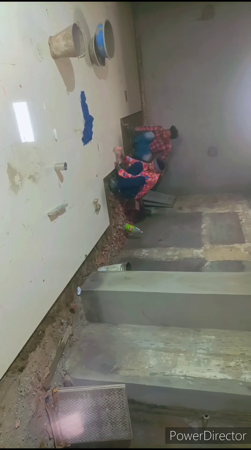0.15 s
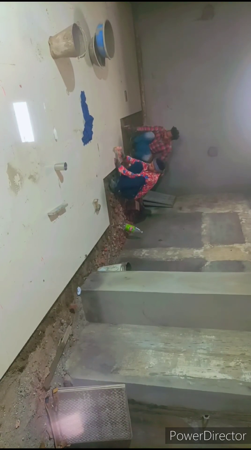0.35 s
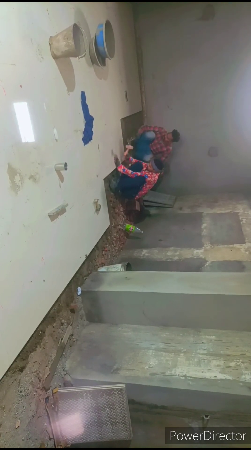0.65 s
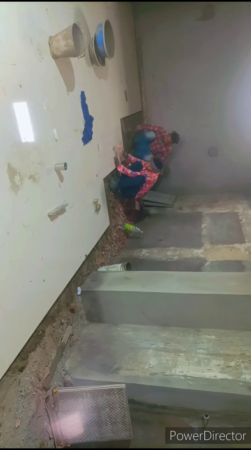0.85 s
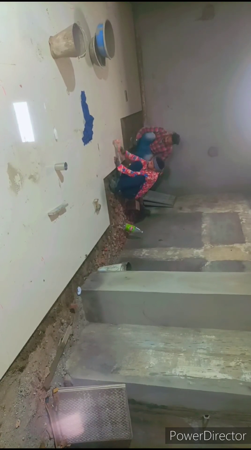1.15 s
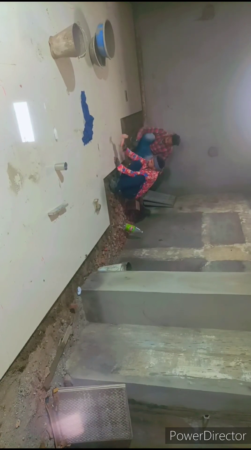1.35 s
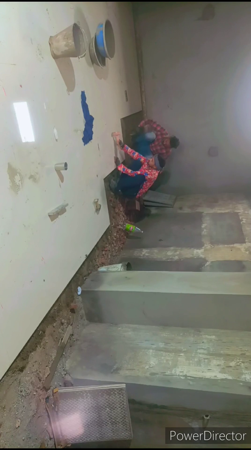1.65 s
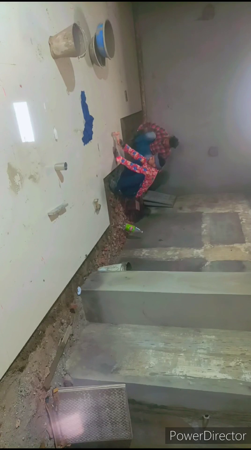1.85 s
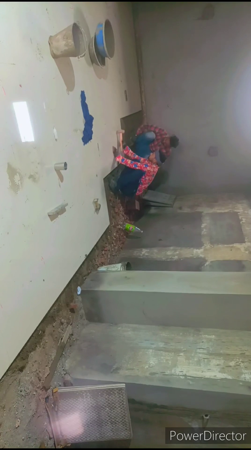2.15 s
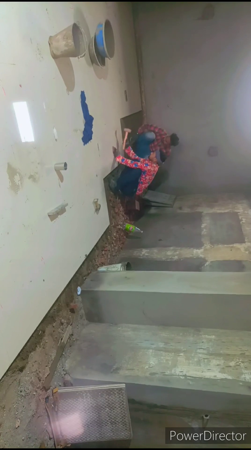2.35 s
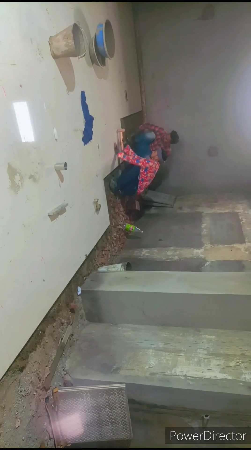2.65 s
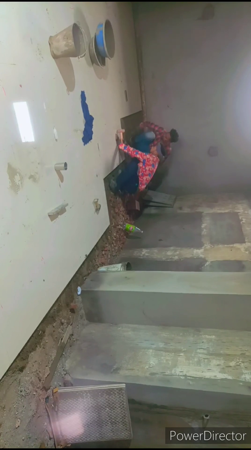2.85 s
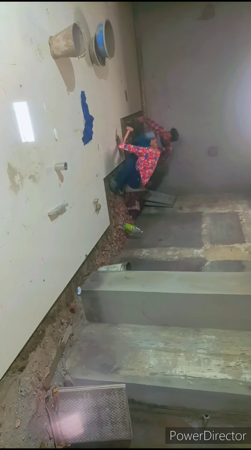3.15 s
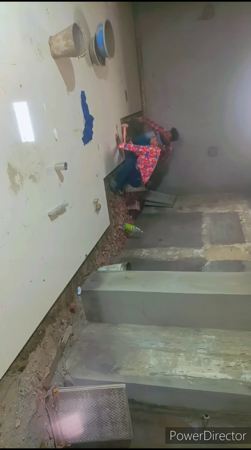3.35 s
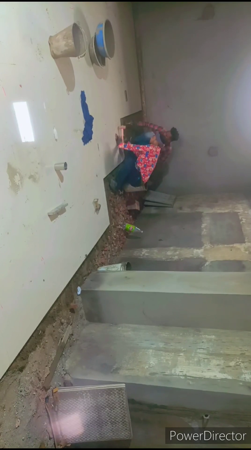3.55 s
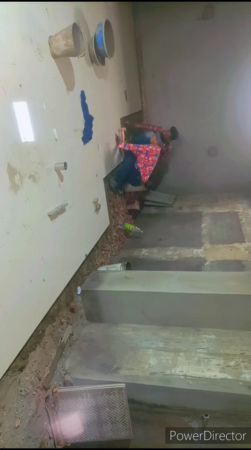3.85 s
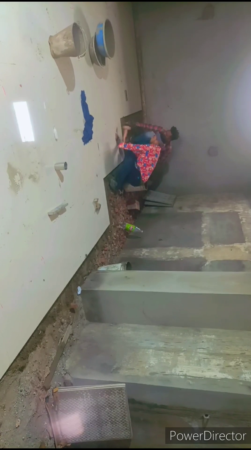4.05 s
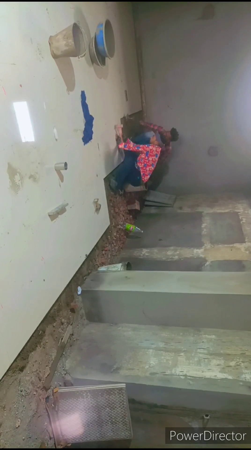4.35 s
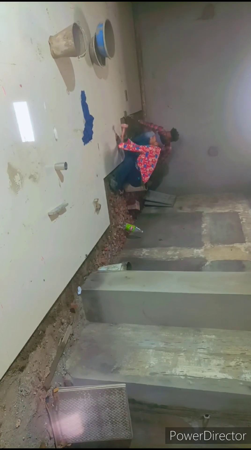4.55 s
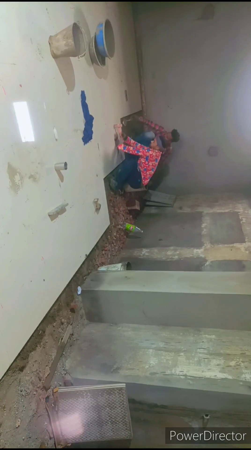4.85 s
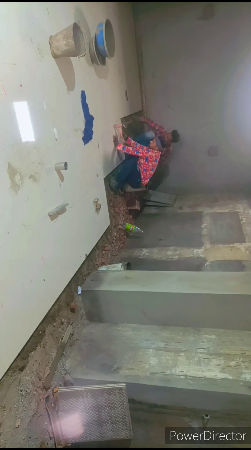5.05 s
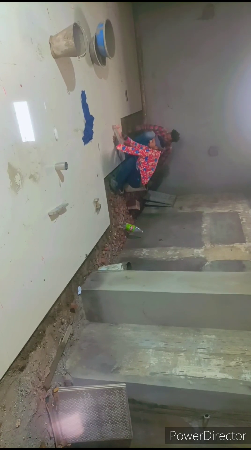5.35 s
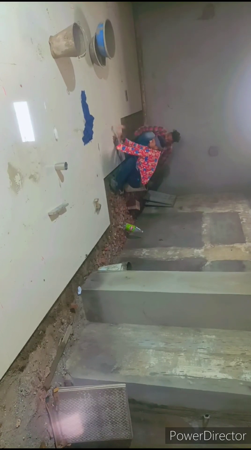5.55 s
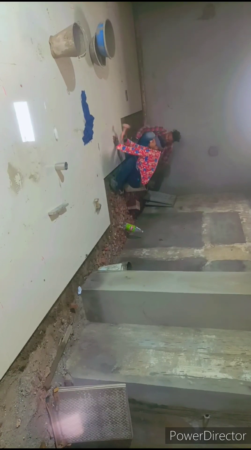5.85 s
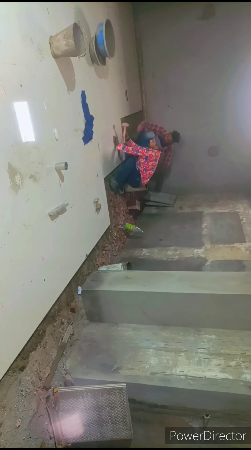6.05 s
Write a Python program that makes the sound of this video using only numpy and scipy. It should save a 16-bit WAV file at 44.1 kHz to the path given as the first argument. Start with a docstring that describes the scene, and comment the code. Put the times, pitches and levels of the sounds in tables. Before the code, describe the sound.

Heavy, hollow mallet thuds on tile, two or three a second at most, boom through an empty concrete room, with faint gritty swishes between.

```python
"""Bedding a floor tile with a rubber mallet

A tiler strikes a tile a few metres away in a bare concrete room. Each blow is a short knock plus a tile clack,
returned by the walls as a long boom: shaped noise and standing waves that alter as the mallet moves.
Shaped noise gives faint gritty swishes between blows (perhaps a hand on the tile), one tick and still air.
Gain control flattens the attacks."""
import sys
import numpy as np
from scipy import signal
from scipy.fft import rfft, irfft
from scipy.io import wavfile
from scipy.ndimage import uniform_filter1d, minimum_filter1d

SR = 44100
rng = np.random.default_rng(int(sys.argv[2]) if len(sys.argv) > 2 else 0)


def log_audio(samples):
    """Write samples as a 16-bit WAV file to the path given in sys.argv[1]."""
    # one column per channel
    frames = np.atleast_2d(samples).T
    # limit to full scale, then quantise
    limited = np.clip(frames, -1, 1)
    pcm = np.round(limited * 32767).astype(np.int16)
    wavfile.write(sys.argv[1], SR, pcm)


N = 273400

# colour of grit on the tile: (frequency [Hz], relative level [dB/Hz])
GRIT_SPECTRUM = [(500, -18), (2500, 10), (5000, 3.5), (7500, 1), (9500, -7.5), (15500, -12.5)]


def mallet(level_db=4, boom_db=-18.0, modes_db=-32, clack_level_db=-24.0, size=98304):
    """Blows on nearly the same spot wake nearly the same echoes; short waves change first as the spot moves."""
    # blows: (time [s], force [dB], hollowness of the spot [dB], clack pitch [Hz])
    blows = [ (-.27, 0.5, 6, 3400), (.045, .5, 2.5, 3420), (0.6854, 1.5, 3.5, 3290), (1.0778, .5, 4, 3390),
             (1.397, 0.5, 3, 4000), (2.0933, 1.5, 0, 4000), (2.4166, 4.5, -0.7, 3204),
             (3.1754, 0.5, -1.5, 4010), (3.4824, 1.5, -1.5, 3326), (3.777, 0.5, -2, 4005),
             (4.0575, -0.5, 0.5, 3300), (4.3168, 1.5, -0.2, 3930), (4.563, 1.7, 2.5, 3310),
             (5.2343, -0.5, 1.5, 3290), (5.5436, 1, 4.5, 3810), (5.8701, -0.2, 1, 3390),
             (6.1525, -4.5, -2, 3310)]
    # radiation of mallet and bedded tile: (frequency [Hz], relative level [dB/Hz])
    thud_spectrum = [(25, -40.5), (68, -28), (82, -14), (110, -12), (165, 2.5), (400, 3), (680, 0.5),
                     (1300, -11), (1700, -10.5), (2070, -11), (2300, -21.5), (3300, -26.5), (5000, -40),
                     (7500, -44), (15500, -63.5)]
    # a hollow spot thumps deeper, clicks brighter: (frequency [Hz], gain per dB of hollowness [dB/dB])
    hollow_tilt = [(190, 1.0), (330, 0), (650, 0.23), (1050, -0.25), (1700, 1.01), (3500, 0.95)]
    # standing waves of the room: (frequency [Hz], relative level [dB])
    room_modes = [(81, 1.5), (178, -17.5), (285, -19), (312, -6.5), (361, 2), (398, 4), (431, 3.5),
                  (484, -1), (554, -1), (630, -0.5), (657, 4.5), (721, -6.5), (759, -10), (824, 4.5),
                  (921, -20), (991, -19.5)]
    aim_m = 0.017  # typical distance between successive blows
    shift_s, shift_m = 1.9, 0.18  # one move, in a pause, to another part of the tile
    clack_choke = 0.5  # dB of clack lost per dB of hollowness: a solid spot clacks hardest

    hz = np.fft.rfftfreq(size, 1 / SR)
    t = np.arange(size) / SR
    wavenumber = 2 * np.pi * hz / 343  # rad/m
    mode_hz, mode_db = np.transpose(room_modes)
    mode_wavenumber = np.interp(mode_hz, hz, wavenumber)
    waves = gain_of(modes_db + mode_db)[:, None] * np.exp(2j * np.pi * mode_hz[:, None] * t)
    phases = rng.uniform(0, 2 * np.pi, len(mode_hz))
    echoes = rfft(rng.standard_normal(size))
    early = first_arrivals(hz)
    out = np.zeros(N)
    previous_s = -np.inf
    for s, force_db, hollow_db, clack_hz in blows:
        move_m = shift_m if previous_s < shift_s <= s else aim_m
        previous_s = s
        alike = np.exp(-wavenumber * move_m)
        fresh = rfft(rng.standard_normal(size))
        echoes = alike * echoes + np.sqrt(1 - alike ** 2) * fresh
        phases = phases + mode_wavenumber * move_m * rng.standard_normal(len(mode_hz))

        standing = (np.exp(1j * phases) @ waves).real
        room = gain_of(boom_db) * die_away(irfft(echoes) + standing)
        room[:size // 2] += early[:size // 2]

        spectrum = [(f, db + hollow_db * read(hollow_tilt, f)) for f, db in thud_spectrum]
        knock = signal.fftconvolve(room, causal_pulse(spectrum))
        add(out, s, gain_of(level_db + force_db) * knock)
        clack_db = clack_level_db + force_db - clack_choke * hollow_db
        add(out, s, gain_of(clack_db) * clack(clack_hz, room))
    return out


def clack(hz, room, t60_s=0.0094, upper_hz=4300, upper_db=-4, wall_s=0.0056, wet_db=-9):
    """Two bending modes of the tile, choked by the mortar; they beam sideways and arrive off the near wall."""
    t = np.arange(2048) / SR
    modes = np.sin(2 * np.pi * hz * t) + gain_of(upper_db) * np.sin(2 * np.pi * upper_hz * t)
    ring = modes * np.exp(-np.log(1000) * t / t60_s)
    path = gain_of(wet_db) * room / np.linalg.norm(room)
    path[round(wall_s * SR)] += 1
    return signal.fftconvolve(path, ring)


def first_arrivals(hz, treble_hz=5200):
    """Direct sound and single reflections; the treble comes off some walls more strongly."""
    # direct sound and nearest walls: (delay [s], level [dB], extra treble [dB])
    arrivals = [(0, 5.5, 4.5), (.0064, -11.5, -0.5), (0.013, -3, -2), (0.022, -4, 10), (0.0363, -3, -2.5),
                (0.041, 2, 9)]
    treble = 1 / (1 + (treble_hz / (hz + 1)) ** 6)
    response = 0
    for delay_s, db, extra_db in arrivals:
        # minus sign: arrivals are inverted
        response = response - gain_of(db + extra_db * treble) * np.exp(-2j * np.pi * hz * delay_s)
    return irfft(response)


def die_away(field, build_s=0.0021, scatter=0.94, scatter_s=0.18, scatter_hz=2500):
    """Nearby things scatter bright sound at once; then each band of the room fades at its own rate."""
    # decay of the room: (frequency [Hz], time to fall 60 dB [s])
    room_t60 = [(80, 3.27), (200, 1.73), (560, 1.5), (1500, 1.31), (2100, 1.566), (4000, 1.056),
                (7500, 0.9), (13000, 0.43)]
    hz, t, z = signal.stft(field, SR, nperseg=512)
    brightness = (hz / (hz + scatter_hz))[:, None]
    z = z * (1 + scatter * brightness * np.exp(-t / scatter_s))
    fade_db = -60 * t / read(room_t60, hz)[:, None]
    tail = signal.istft(z * gain_of(fade_db), SR, nperseg=512)[1]
    build = 1 - np.exp(-(np.arange(len(field)) / SR / build_s) ** 2)
    return tail[:len(field)] * build


def causal_pulse(points, size=8192):
    """Minimum-phase pulse of unit energy: the most compact one with this spectrum and a causal start."""
    hz = abs(np.fft.fftfreq(size, 1 / SR))
    log_gain = np.log(gain_of(read(points, hz)))
    spectrum = np.exp(np.conj(signal.hilbert(log_gain)))
    pulse = irfft(spectrum[:size // 2 + 1])[:size // 2]
    return pulse / np.linalg.norm(pulse)


def swishes(swell_s=0.092, fade_s=0.14):
    """Fine grit rubbed over the glaze: each stroke swells and trails off."""
    # strokes: (start [s], level [dB])
    strokes = [(.28, -52.5), (.91, -51), (1.29, -55), (1.67, -52.5), (2.81, -57.5), (4.44, -54),
               (4.91, -53.5), (5.40, -55)]
    t = np.arange(N) / SR
    power = np.zeros(N)
    for s, db in strokes:
        rise = np.clip((t - s) / swell_s, 0, 1)
        fall = np.maximum(t - s - swell_s, 0) / fade_s
        power += gain_of(db) ** 2 * rise * np.exp(-2 * fall ** 2)
    return np.sqrt(power) * noise(GRIT_SPECTRUM)


def tick(tick_s=1.9635, tick_db=-31):
    """One faint dry tick, perhaps a grain of grit: a single pulse of the grit spectrum."""
    out = np.zeros(N)
    add(out, tick_s, gain_of(tick_db) * causal_pulse(GRIT_SPECTRUM))
    return out


def still_air(level_db=-48):
    """Quiet background of the building: steady coloured noise."""
    # background colour: (frequency [Hz], relative level [dB/Hz])
    air_spectrum = [(20, -24.5), (60, -8.5), (85, -2.5), (120, -7), (400, 1), (2000, 1), (5000, -23),
                    (8000, -30.5), (15000, -45.5)]
    return gain_of(level_db) * noise(air_spectrum)


def gain_of(db):
    """Decibels to amplitude."""
    return 10 ** (np.asarray(db) / 20)


def read(points, hz):
    """Curve through the points, linear on a log-frequency axis."""
    f, value = np.transpose(points)
    return np.interp(np.log(hz + 1), np.log(f), value)


def add(mix, s, sound):
    """Mixes a sound in at time s, cropped to the mix."""
    start = round(s * SR)
    sound = sound[max(-start, 0):]
    part = mix[max(start, 0):][:len(sound)]
    part += sound[:len(part)]


def noise(points):
    """Gaussian noise filtered to a spectrum, rms 1."""
    gain = gain_of(read(points, np.fft.rfftfreq(N, 1 / SR)))
    x = irfft(rfft(rng.standard_normal(N)) * gain, N)
    return x / x.std()


def scene():
    """Sum of mallet, swishes, tick and still air, one channel."""
    return (mallet() + swishes() + tick() + still_air())[None]


def record(dry, threshold_db=-16.0, ratio=6, recover_db_per_s=30, ahead_s=0.012, sense_s=0.0083,
           rail=1.0, edge_hz=15650):
    """Look-ahead gain control dips before loud blows, then recovers; peaks round off; then the band limit."""
    power = uniform_filter1d(dry[0] ** 2, int(sense_s * SR))
    level_db = 10 * np.log10(abs(power) + 1e-12)
    over_db = np.maximum(level_db - threshold_db, 0) * (1 - 1 / ratio)
    # instant cut, steady recovery
    recovery_db = np.arange(N) * recover_db_per_s / SR
    cut_db = np.maximum.accumulate(over_db + recovery_db) - recovery_db
    ahead = int(ahead_s * SR)
    gain_db = uniform_filter1d(minimum_filter1d(-cut_db, 2 * ahead), ahead)
    held = dry * gain_of(gain_db)
    rounded = held / (1 + (held / rail) ** 8) ** (1 / 8)
    band = signal.firwin(511, edge_hz, window=("kaiser", 9), fs=SR)
    return signal.oaconvolve(rounded, band[None], "same")


dry = scene()
out = record(dry)
log_audio(out)
```